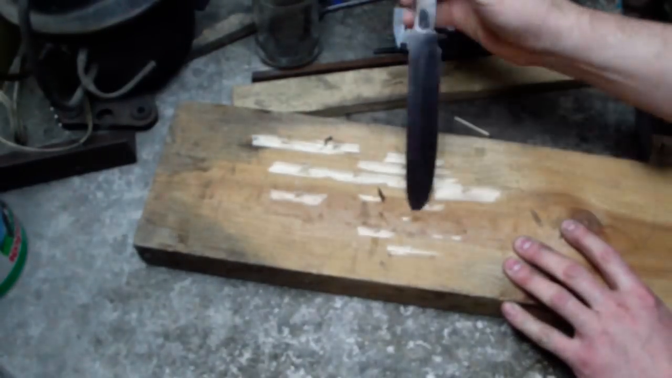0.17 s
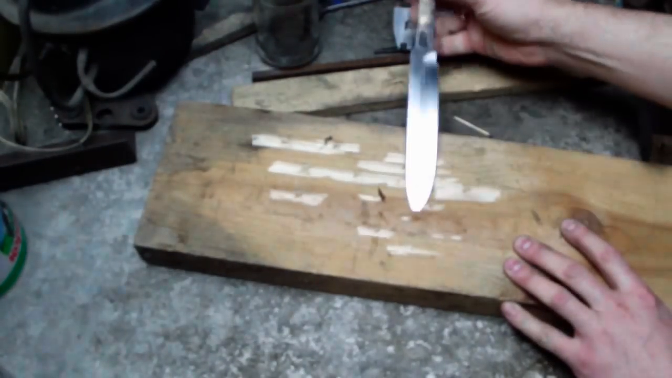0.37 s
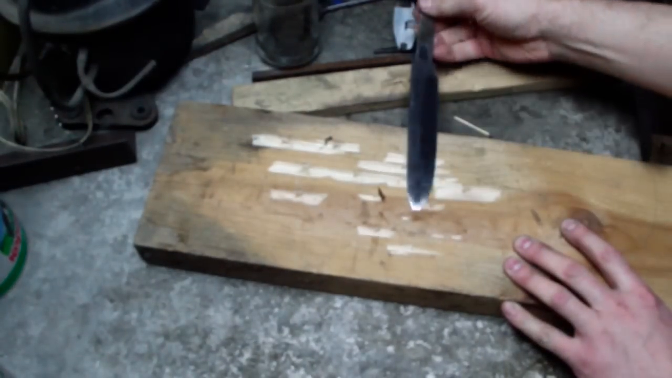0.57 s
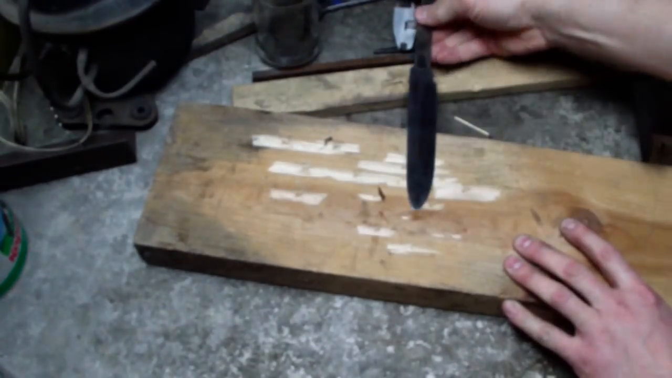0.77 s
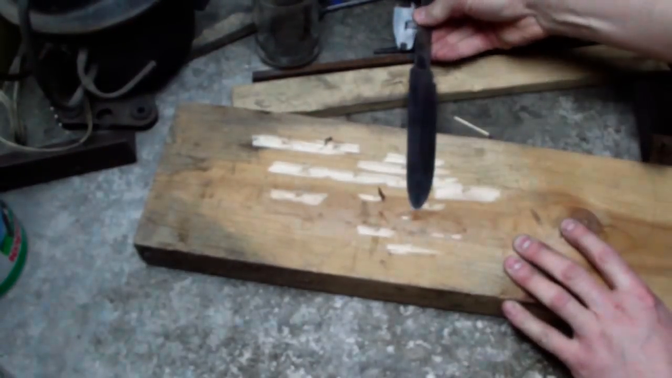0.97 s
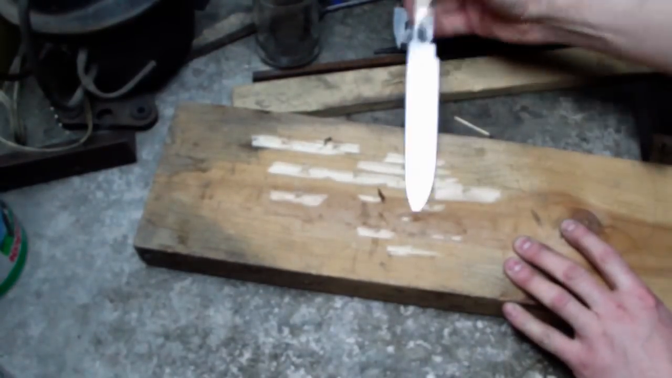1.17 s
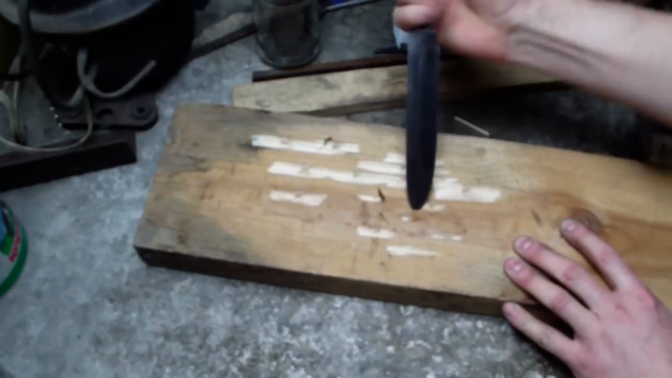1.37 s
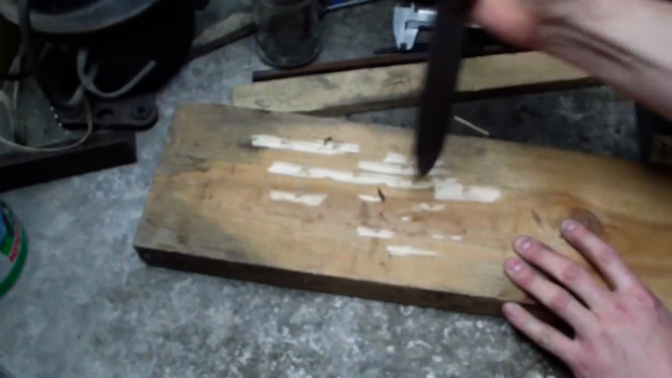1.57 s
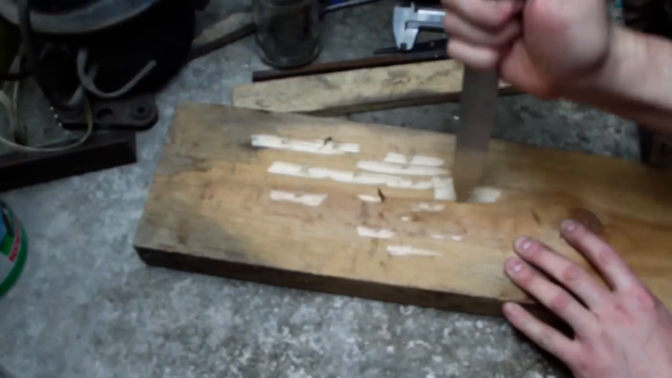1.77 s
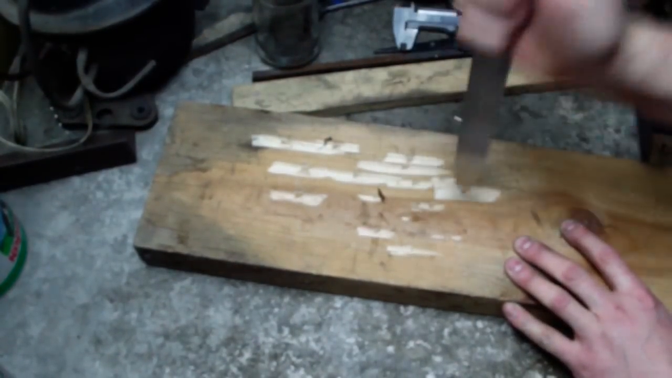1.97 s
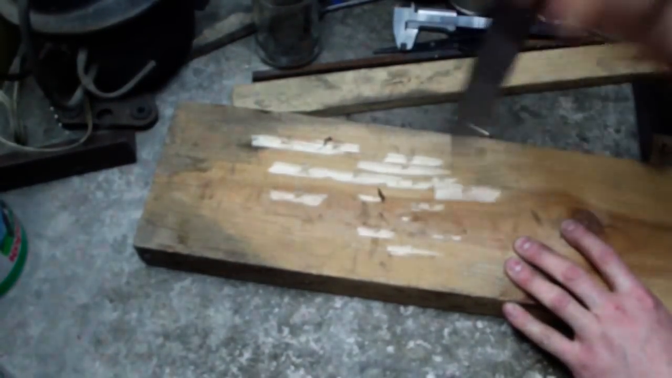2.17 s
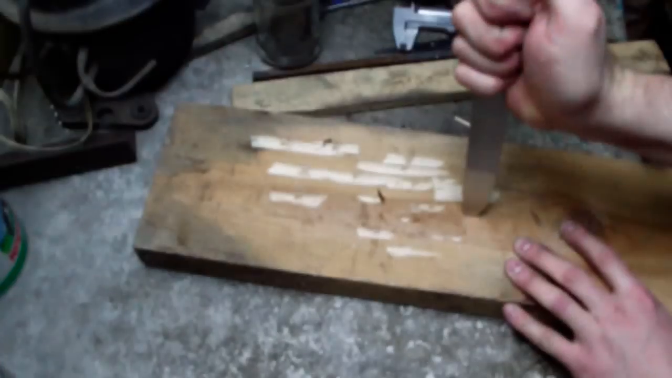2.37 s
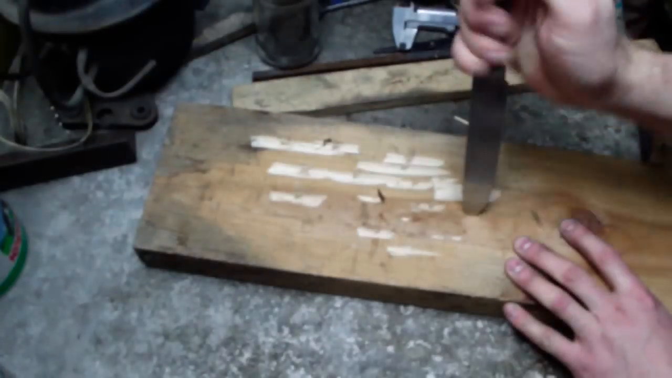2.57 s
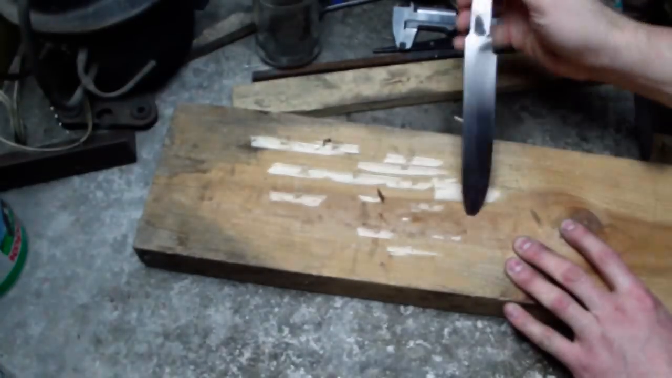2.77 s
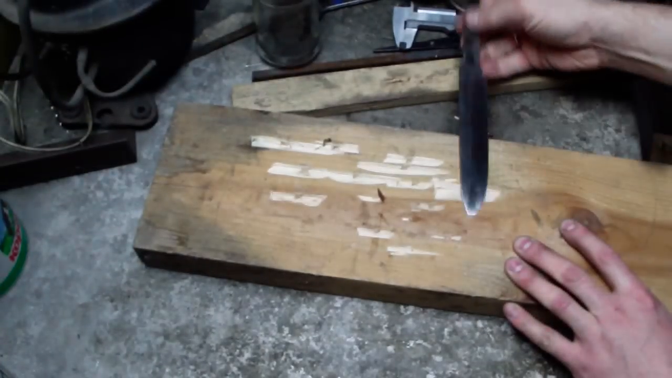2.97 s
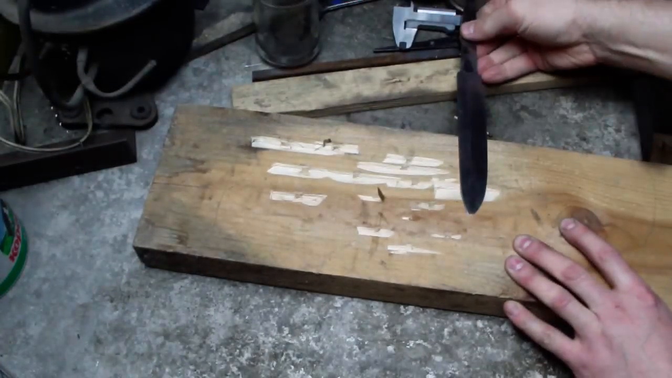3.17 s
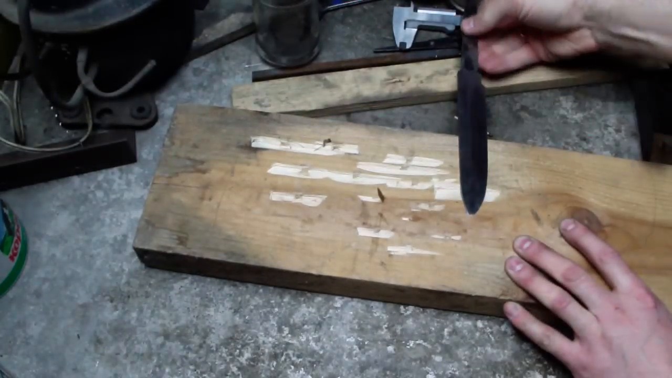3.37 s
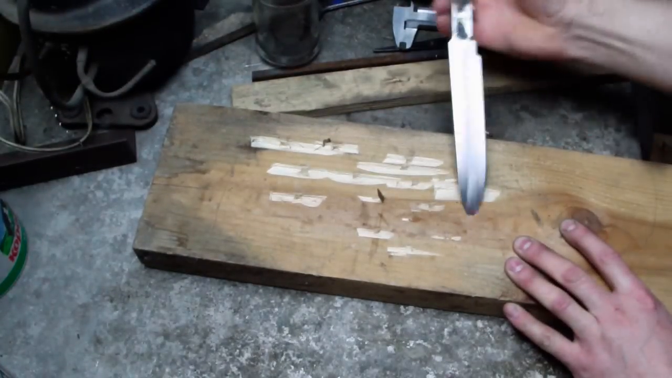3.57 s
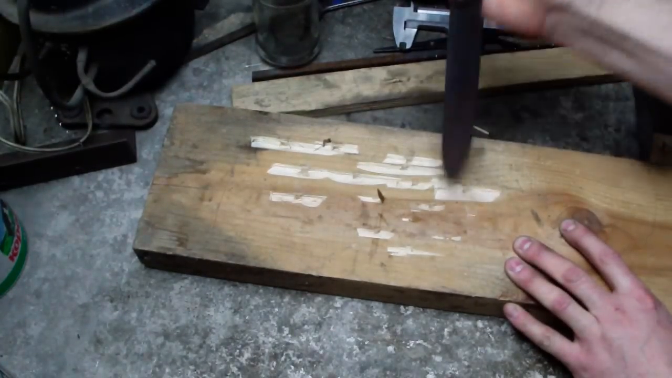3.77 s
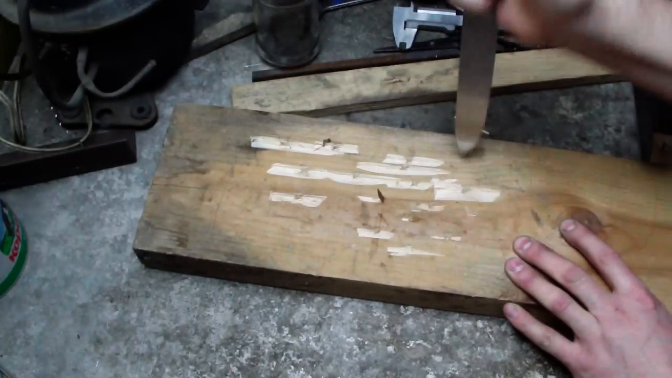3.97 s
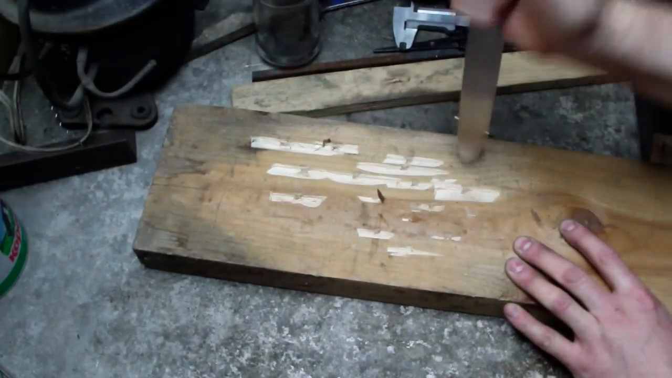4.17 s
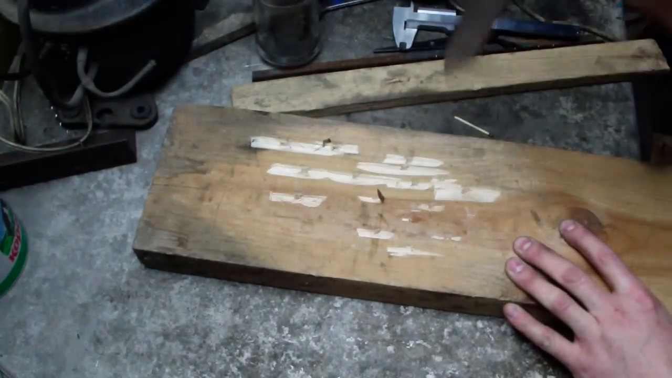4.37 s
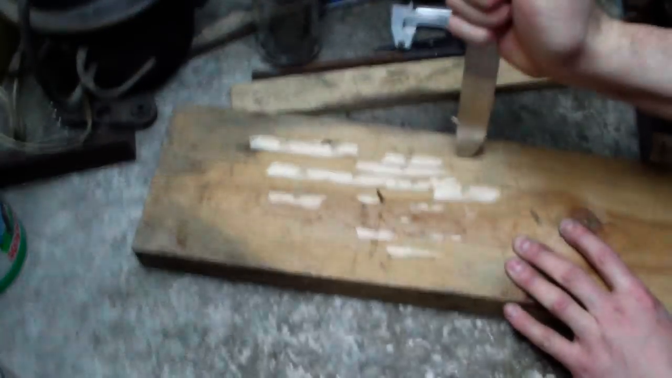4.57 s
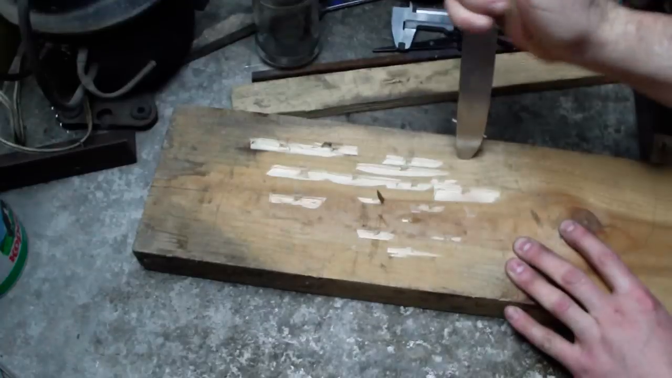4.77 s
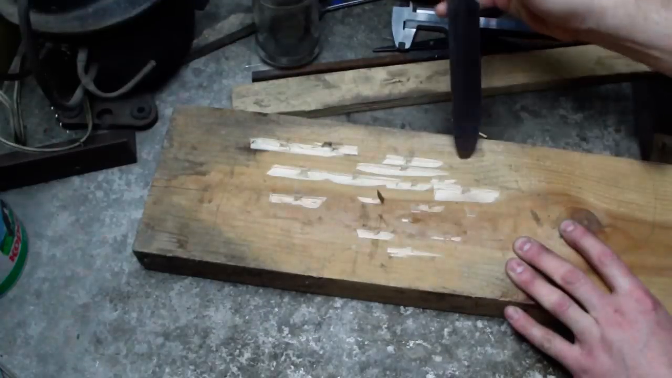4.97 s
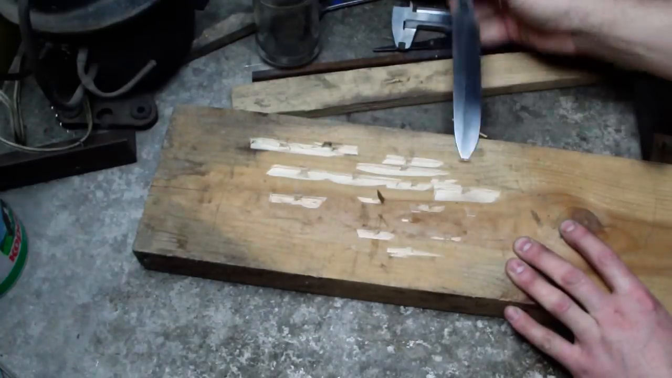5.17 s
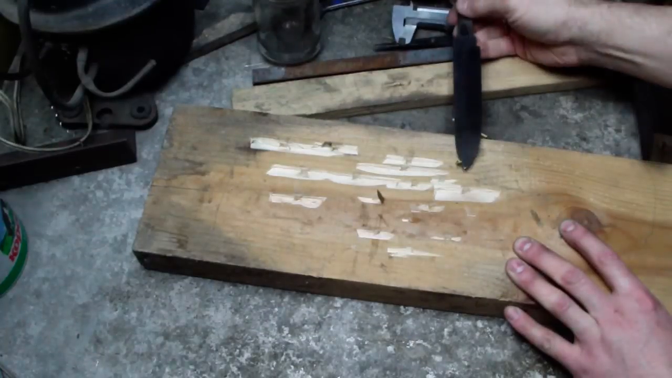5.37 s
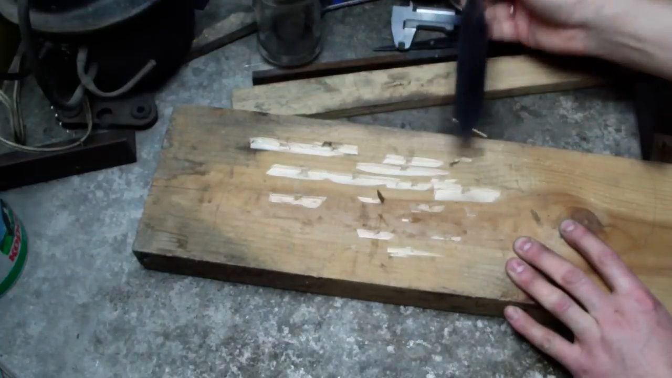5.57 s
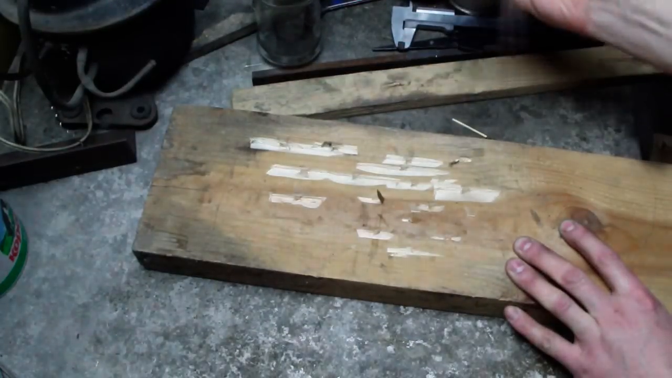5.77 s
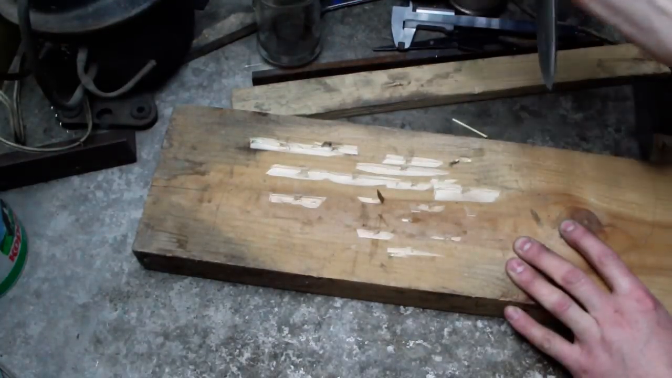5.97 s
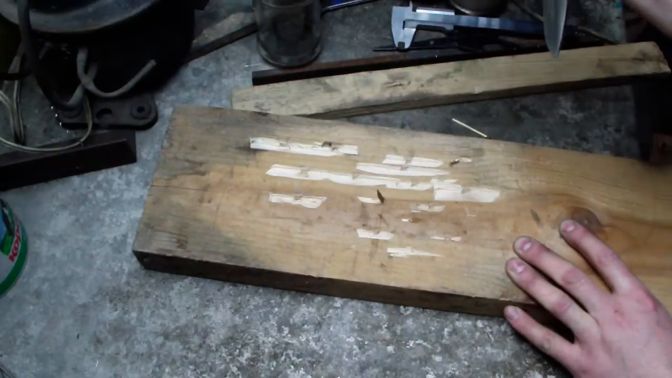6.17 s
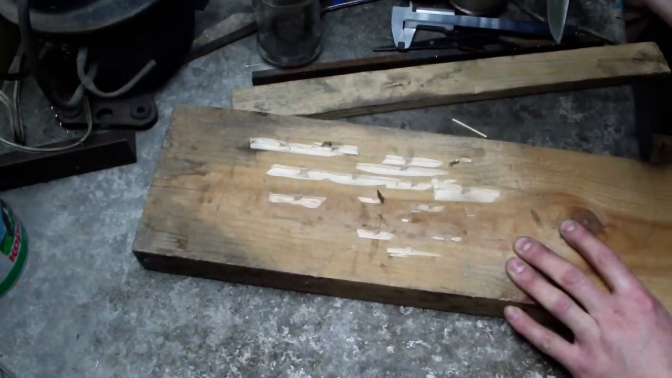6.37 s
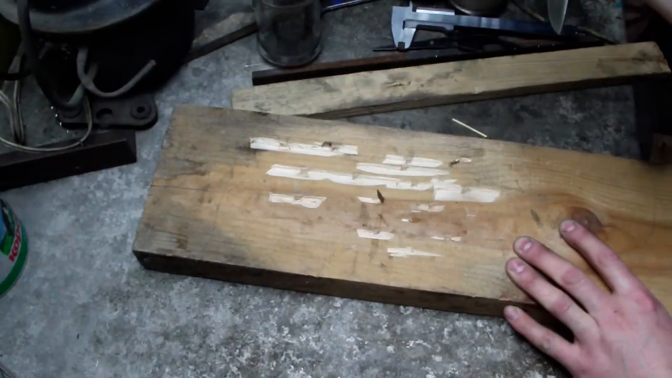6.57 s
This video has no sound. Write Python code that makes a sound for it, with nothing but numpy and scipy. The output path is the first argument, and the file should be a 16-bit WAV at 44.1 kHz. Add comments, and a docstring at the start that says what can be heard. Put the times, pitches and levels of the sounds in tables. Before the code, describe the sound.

Two violent knife stabs into a board rattle a workshop bench, separated by handle clicks, wooden knocks, soft rubbing and constant camera hiss.

```python
"""A knife is stabbed twice into a plank on a cluttered workbench: noisy, snapping bursts with rattling tools.
Between and after the stabs it is worked loose and turned in the hand, as knocks, clicks, rubs and one twang.
The plank rocks to rest in ever softer bounces, and filtered pushes ring the low modes of the bench.
The place is a small workshop with sparse reflections, heard from a camera standing close on the bench.
Its stereo microphone brings hiss, a thin whine and lens ticks; its limiter flattens the stabs."""
import sys
import numpy as np
from scipy import signal
from scipy.fft import rfft, irfft
from scipy.io import wavfile
from scipy.ndimage import uniform_filter1d

SR = 44100
rng = np.random.default_rng(int(sys.argv[2]) if len(sys.argv) > 2 else 0)


def waveform_to_disk(signal):
    """Save audio, clipped to [-1, 1], as 16-bit WAV at the path in sys.argv[1]."""
    frames = np.transpose(np.atleast_2d(signal))
    scaled = np.clip(frames, -1, 1) * 32767
    samples = np.round(scaled).astype(np.int16)
    wavfile.write(sys.argv[1], SR, samples)


N = 292294

# Steady hiss: (frequency [Hz], relative density [dB per Hz])
HISS_SPECTRUM = [(20, 10), (45, 8), (90, -3), (170, -10.5), (400, -13.5), (750, -16.5), (1500, -16),
                 (2200, -13.5), (3300, -10), (4000, -13), (5300, -22), (7600, -17.5), (9500, -21.5),
                 (15500, -26)]
# Resonances of the camera housing in the hiss: (frequency [Hz], width [Hz], height [dB])
HOUSING_PEAKS = [(1273, 76, 8.4), (1787, 165, 17), (2842, 257, 8.7), (14800, 600, 7.4)]
# Likeness of the hiss on the two sides: (frequency [Hz], left-right correlation [0..1])
HISS_LIKENESS = [(300, 1), (1400, 1), (3100, 0.99), (6800, 0.86), (12000, 0.7), (15000, .1)]
# Steady electronic whine: (frequency [Hz], RMS level [dB])
WHINE_TONES = [(7440, -42.5), (14880, -46.5), (15121, -65)]
HISS_LEVEL_DB = -33

# Decay of the workshop's reflections: (frequency [Hz], time to fall 60 dB [s])
ROOM_DECAY = [(100, 0.65), (500, 0.37), (1400, 0.27), (3500, 0.25), (9000, 0.13)]

# Pushes on the bench, mostly hands leaning on it, and the low thud of the knock at 1.76 s: (time [s], level
# [dB], length of push [s], strongest frequency [Hz])
BENCH_PUSHES = [(1.062, -18, 0.02, 36.2), (1.14, -27, 0.18, 27.6), (1.757, -25, 0.11, 40),
                (1.868, -24.5, .18, 55), (2.619, -28.5, 0.094, 30), (3.341, -22.5, 0.14, 28),
                (3.977, -17, 0.02, 32.66), (4.078, -23, .18, 54)]
# Bench sway and the ring of its top: (frequency [Hz], relative level [dB], time to fall 60 dB [s])
BENCH_MODES = [(28.25, 2, 0.64), (40, 2.5, 0.23), (50.2, 1, 0.39), (70.6, 2.5, 0.27), (78, -2.5, 0.4),
               (93, 4.5, 0.32), (169.2, -7, 0.28), (231.4, -0.5, 0.11), (412, -1.5, 0.076),
               (524, -2, 0.056), (657, -24, .12)]
# The arm bears down behind the point, then lets go once the rattle is over
SHOVE_S, SHOVE_HZ = 0.16, 90
RELEASE_AFTER_S, RELEASE_DB, RELEASE_S, RELEASE_HZ = 0.0299, -10.5, 0.062, 51
# What a knock passes on to the bench; growth is in dB per dB of the knock's body
JOLT_DB, JOLT_GROWTH, JOLT_S, JOLT_HZ = -17.5, 0.68, 0.12, 127

# Lens hunting for focus in runs of even steps: (start [s], length [s], level of first tick [dB])
FOCUS_RUNS = [(2.4685, 0.084, -23.5), (2.6854, 0, -23), (2.87, .2, -25.5), (3.17, .3105, -23),
              (3.6878, 0, -22.5), (4.127, .092, -19.5), (4.391, 0, -20.5), (4.81, .1012, -24.5),
              (6.2955, .2, -24)]
FOCUS_STEP_S = .1  # approximate spacing
# Rasp of the lens drive: (frequency [Hz], gain [dB])
LENS_RASP = [(1000, -4.5), (3500, 8.5), (6000, -6), (12000, -20.0)]

# Palm brushing softly as the grip changes: (start [s], length [s], RMS level before its fades [dB])
PALM_BRUSHES = [(1.099, 0.23, -37.5), (1.854, 0.085, -41)]
# Colour of the palm's rustle: (frequency [Hz], gain [dB])
PALM_COLOUR = [(200, -21), (370, 4.5), (600, -12), (900, 5), (1200, -7), (1650, 6), (2300, -2), (3500, -8),
               (6000, -24), (12000, -35)]
# Fingers sliding on the handle: (start [s], end [s], RMS level before its fades [dB], brightness [dB])
FINGER_SLIDES = [(0.022, 0.43, -37, -2), (2.649, 3.002, -34, 2), (3.483, 3.656, -43, 4),
                 (4.609, 4.807, -36.5, -3), (4.902, 5.22, -37.5, 6)]
# Colour of skin on the handle: (frequency [Hz], gain [dB])
SKIN_COLOUR = [(200, -17), (500, -5.5), (800, -3.5), (1200, 7.5), (2000, 0), (3200, 6.5), (5000, -17),
               (7000, -2), (8500, 2.5), (10000, -8), (12000, -14), (15000, -22)]

# Handle clicking against the fingers: (time [s], level before colouring [dB], brightness [dB], ringing [Hz])
HANDLE_CLICKS = [(0.2254, -27, -5, 1160), (0.233, -24, -3.5, 1120), (0.327, -44, 11.5, 2940),
                 (0.5555, -25.5, 7.5, 3260), (0.584, -33, 6.5, 530), (0.609, -21.5, -8, 3300),
                 (2.769, -22.5, -8.5, 1250), (2.883, -28, 1.5, 2940), (2.9722, -21, 4, 1250),
                 (4.875, -30.5, -4.5, 3050), (4.936, -32.5, 1, 2850), (4.96, -25.5, -1.5, 2840),
                 (4.9834, -22.5, -3.5, 2790), (5.06, -23, -2, 1280), (5.0838, -22, -18, 2440),
                 (5.267, -18, -7.5, 3120)]
# Knife held in the hand: (frequency [Hz], relative level [dB], time to fall 60 dB [s])
KNIFE_MODES = [(540, -13, 0.11), (943, -9, 0.12), (1210, 2, 0.024), (1575, 4, 0.044), (2630, 22, 0.0044),
               (3340, 11, 0.014), (5180, -15, 0.099), (6170, -20, 0.021), (8200, 23, 0.017),
               (8860, 17, 0.0073), (9000, 3, .03)]
CLICK_BODY_DB, CLICK_T60_S = -4, 0.08  # body relative to crack; decay of the chatter
# Colour of the handle: (frequency [Hz], gain [dB]); small and hard, with less body than the plank
HANDLE_COLOUR = [(300, -4.5), (550, -0.5), (800, -4.5), (1200, 4), (2300, 1), (3400, 2.5),
                 (5600, 3.5), (8500, 3), (10000, 12), (11500, 10.5), (14000, 13)]
# Ring of the freed blade: (frequency [Hz], relative level [dB], time to fall 60 dB [s])
TWANG_MODES = [(1263, 3, .06), (1480, -9, .04), (5520, -20, .09), (6020, -14, 0.085)]
TWANG_S, TWANG_DB = 2.9725, -15  # start and level

# Blade and plank knocking: (time [s], level before colouring [dB], hardness [dB], ringing [Hz])
KNOCKS = [(0.715, -37, 2.5, 910), (1.759, -26, 5, 1260), (1.933, -40.5, -1.5, 960), (3.091, -26, 1, 920),
          (3.1054, -19, 6.5, 1710), (3.974, -27.5, -4.5, 516), (4.0173, -27, 4, 3040),
          (4.0765, -27.5, 10, 1870), (4.572, -13, 31, 3140), (4.5774, -4, 27, 1850), (4.586, -24, 20, 1840),
          (5.166, -22.5, 4, 1270), (5.1738, -15, 5, 1690), (5.2248, -8, 2.5, 2540),
          (5.2995, -15.5, 9, 3050), (5.3071, -10.5, 6.5, 2920), (5.4434, -14, -3.5, 925),
          (5.451, -9, 8, 1090), (5.475, -17, -1, 420), (5.5174, -8, 4, 1625)]
# Plank: (frequency [Hz], relative level [dB], time to fall 60 dB [s])
PLANK_MODES = [(182, 3, 0.12), (224, -14, 0.12), (407.5, 8, 0.05), (491, -9, 0.12), (618, 10, 0.13),
               (738, -6, 0.067), (935, 15.5, 0.044), (1094, 5.5, 0.034), (1380, 9, 0.018),
               (1550, -4, 0.066), (2035, 8.5, 0.023), (2260, -7, 0.033), (2770, 12, 0.019),
               (3190, 23, 0.012), (3440, 10, 0.029)]
# Colour of every blow: (frequency [Hz], gain [dB])
BLOW_COLOUR = [(40, 11), (150, 2.5), (240, 2.5), (320, -0.5), (450, 4), (600, 3.5), (760, 0), (950, 4.5),
               (1250, 1.5), (2000, -0.5), (3200, 0.5), (3900, -7.5), (4800, -25), (5500, -23.5),
               (7200, -10.5), (8600, -10), (11000, -24.5), (15000, -46)]
# Colour of plank knocks: (frequency [Hz], gain [dB]); wood is fuller and flatter than steel
PLANK_COLOUR = [(100, 1.5), (200, 2), (300, -2), (450, -1), (600, 0), (900, -1.5), (1400, 0),
                (3000, -2.5), (4300, 2), (5500, 6), (8000, 3), (11000, 1.5), (14000, 5)]
# The plank rocks to rest, each bounce sooner and softer than the last
ROCK_START_S, ROCK_GAP_S, ROCK_GAP_KEPT = 5.581, .057, .85
ROCK_DB, ROCK_LOSS_DB, ROCK_HARDNESS_DB, ROCK_HZ = -22.5, 6, -6.5, 880
KNOCK_T60_S, HALVING_HARDNESS_DB = 0.14, 17  # harder contacts die sooner
KNOCK_EDGE_DB, EDGE_GROWTH = -21.5, 0.67  # the top treble grows more slowly than the blow

# Full stabs: (time [s], level [dB], length of rattle [s], 60 dB fall of its end [s], shove on bench [dB])
STABS = [(2.1821, -1, 0.13, 0.18, -5.5), (4.402, 1, 0.115, 0.15, -2.5)]
# Colour of the stabs: (frequency [Hz], gain [dB]); steel on steel is brighter than wood
STAB_COLOUR = [(70, -1.5), (150, 3.5), (250, 0.5), (650, -1.8), (1300, -0.22),
               (2200, 0.0), (3400, 3), (4500, 3), (9000, -0.9)]
EDGE_HZ = 15300  # upper band limit


def amp(db):
    """Decibels to an amplitude factor."""
    return 10 ** (np.asarray(db) / 20)


def evened(x):
    """Scales a sound to unit RMS."""
    return x / np.sqrt(np.mean(x ** 2) + 1e-20)


def read(points, hz):
    """Straight lines between points on a log-frequency axis."""
    f, value = np.transpose(points)
    return np.interp(np.log(hz + 1), np.log(f + 1), value)


def add(mix, s, sound):
    """Lays a sound into the mix at s seconds, cut off at the end of the mix."""
    part = mix[round(s * SR):][:len(sound)]
    part += sound[:len(part)]


def seconds(length):
    """Time axis in seconds."""
    return np.arange(int(length * SR)) / SR


def fade(t, t60):
    """Exponential decay that falls 60 dB in t60 seconds."""
    return amp(-60 * t / t60)


def tint(x, points):
    """Causal minimum-phase filter with the given spectrum."""
    log_gain = np.log(amp(read(points, abs(np.fft.fftfreq(4096, 1 / SR)))))
    taps = np.fft.ifft(np.exp(np.conj(signal.hilbert(log_gain)))).real[:2048]
    return signal.fftconvolve(x, taps)[:len(x)]


def at_level(x, db, size):
    """Scales a sound so that its loudest stretch of size samples has the given RMS level."""
    return x * amp(db) / np.sqrt(uniform_filter1d(x ** 2, size).max() + 1e-20)


def ring(modes, t, spread_db=2.5):
    """Free ringing of an object, with unit energy; each point of contact favours other modes."""
    signs = rng.choice([-1, 1], len(modes))
    weights = signs * amp(spread_db * (2 * rng.random(len(modes)) - 1))
    y = np.zeros(len(t))
    for weight, (hz, db, t60) in zip(weights, modes):
        y += weight * amp(db) * fade(t, t60) * np.sin(2 * np.pi * hz * t)
    return y / np.linalg.norm(y)


def chatter(t, t60, grain_db):
    """Dying crowd of tiny contacts of uneven size."""
    sizes = amp(grain_db * np.minimum(rng.exponential(1, len(t)), 4))
    return evened(rng.standard_normal(len(t)) * sizes) * fade(t, t60)


def blow(modes, levels, t60, hz, ring_db, snap, grain_db, favour_db, favour_q):
    """A sharp contact and its chatter ring an object; the spot struck favours one resonance."""
    t = seconds(.3)
    force = chatter(t, t60, grain_db)
    force[0] += snap
    ringing = signal.fftconvolve(force, ring(modes, t))[:len(t)]
    coloured = tint(force + amp(ring_db) * ringing, BLOW_COLOUR)
    sound = np.zeros(len(t))
    # body, crack and edge, each at its own level
    for edges, db in zip([(120, 1500), (1500, 4800), (5200, 15000)], levels):
        band = signal.butter(3, edges, "band", fs=SR, output="sos")
        sound += at_level(signal.sosfilt(band, coloured), db, size=256)
    return sound + amp(favour_db) * signal.lfilter(*signal.iirpeak(hz, favour_q, SR), sound)


def camera_noise():
    """Hiss coloured by the resonances of the housing, and a steady electronic whine."""
    hz = np.fft.rfftfreq(N, 1 / SR)
    shape_db = read(HISS_SPECTRUM, hz)
    for centre, width, db in HOUSING_PEAKS:
        shape_db += db / (1 + ((hz - centre) / width) ** 2) ** 2
    first, second = rfft(rng.standard_normal((2, N)))
    same = np.clip(read(HISS_LIKENESS, hz), 0, 1)
    other_side = same * first + np.sqrt(1 - same ** 2) * second
    hiss = irfft(np.array([first, other_side]) * amp(shape_db), N)
    t = np.arange(N) / SR
    whine = np.zeros(N)
    for f, db in WHINE_TONES:
        whine += amp(db) * np.sqrt(2) * np.sin(2 * np.pi * (f * t + rng.random()))
    return amp(HISS_LEVEL_DB) * evened(hiss) + whine


def room(x, wet_db=-15):
    """A small workshop: sparse reflections, each band dying at its own speed."""
    slots = np.arange(220, SR - 20, 20)  # one reflection in every 20 samples
    taps = np.zeros(SR)
    taps[slots + rng.integers(0, 20, len(slots))] = rng.choice([-1, 1], len(slots))
    hz, t, bands = signal.stft(taps, SR, nperseg=256)
    dying = bands * fade(t, read(ROOM_DECAY, hz)[:, None])
    tail = signal.istft(dying, SR, nperseg=256)[1]
    return x + amp(wet_db) * signal.fftconvolve(x, tail / np.linalg.norm(tail))[:N]


def bench(shudder=0.066):
    """Hands, stabs and knocks set the bench swaying; each push drives the modes near its own frequency."""
    pushes = list(BENCH_PUSHES)
    for s, _, rattle_s, _, db in STABS:
        pushes.append((s, db, SHOVE_S, SHOVE_HZ))
        pushes.append((s + rattle_s + RELEASE_AFTER_S, db + RELEASE_DB, RELEASE_S, RELEASE_HZ))
    for s, db, hardness, _ in KNOCKS:
        pushes.append((s, JOLT_DB + JOLT_GROWTH * (db - hardness), JOLT_S, JOLT_HZ))
    out, t = np.zeros(N), seconds(1)
    for s, db, length, hz in pushes:
        force = shudder * rng.standard_normal(len(t)) * np.exp(-2 * t / length)
        force[0] += 1
        two_octaves = signal.butter(1, [hz / 2, hz * 2], "band", fs=SR, output="sos")
        force = signal.sosfilt(two_octaves, force)
        sway = signal.fftconvolve(force, ring(BENCH_MODES, t))[:len(t)]
        add(out, s, at_level(sway, db, size=1024))
    return out


def lens(hz=3350, rise_s=0.00083, grit=0.67, rebound_s=0.0044, rebound_db=-11, rolling_db=-4):
    """Each step of the lens drive ticks and rebounds; once the drive is rolling, the steps are softer."""
    out, t = np.zeros(N), seconds(.02)
    for start, length, db in FOCUS_RUNS:
        step_times = np.linspace(start, start + length, round(length / FOCUS_STEP_S) + 1)
        for step, s in enumerate(step_times):
            rasp = evened(tint(rng.standard_normal(len(t)), LENS_RASP))
            tone = np.sin(2 * np.pi * hz * rng.uniform(0.99, 1.05) * t) + grit * rasp
            tick = at_level(tone * t * np.exp(-t / rise_s), db + rolling_db * (step > 0), size=128)
            add(out, s, tick)
            add(out, s + rebound_s, amp(rebound_db) * tick)
    return out


def brushes(grain_db=5.0):
    """The palm makes a dull, grainy rustle that swells and fades."""
    out = np.zeros(N)
    for start, length, db in PALM_BRUSHES:
        steady = np.zeros_like(seconds(length))  # time stands still: no decay
        rub = tint(chatter(steady, 1, grain_db), PALM_COLOUR)
        add(out, start, amp(db) * evened(rub) * signal.windows.tukey(len(rub), .8))
    return out


def slides(patchy_db=7.0, grain_db=4.0, catches_per_s=60, catch_db=9, catch_t60=0.0074):
    """Skin slips over the handle in tiny grains under an uneven grip, and now and then catches."""
    out, t = np.zeros(N), seconds(1)
    for start, end, db, bright_db in FINGER_SLIDES:
        grip = np.tanh(evened(uniform_filter1d(rng.standard_normal(SR), size=700)))
        catch_starts = 1. * (rng.random(SR) < catches_per_s / SR)
        catches = signal.fftconvolve(catch_starts, fade(t, catch_t60))[:SR]
        rub = chatter(np.zeros(SR), 1, grain_db) * amp(patchy_db * grip)
        rub *= 1 + amp(catch_db + bright_db) * np.minimum(catches, 1)  # a dull slide catches less
        rub = tint(tint(rub, SKIN_COLOUR), [(3000, 0), (7000, bright_db)])
        rub = rub[:len(seconds(end - start))]
        add(out, start, amp(db) * evened(rub) * signal.windows.tukey(len(rub), .5))
    return out


def handle():
    """The knife clicks as it is turned; a brighter click has more edge."""
    out = np.zeros(N)
    for s, db, bright_db, hz in HANDLE_CLICKS:
        levels = db + CLICK_BODY_DB, db, db + bright_db
        click = blow(KNIFE_MODES, levels, CLICK_T60_S, hz, ring_db=-5, snap=7.5, grain_db=0.0,
                     favour_db=4.5, favour_q=16)
        add(out, s, click)
    return tint(out, HANDLE_COLOUR)


def twang():
    """The point springs free of the wood and the blade rings briefly on its own."""
    out = np.zeros(N)
    add(out, TWANG_S, at_level(ring(TWANG_MODES, seconds(.2)), TWANG_DB, size=256))
    return out


def plank_knocks():
    """Every knock and the rocking bounces, as (time [s], level [dB], hardness [dB], ringing [Hz])."""
    rows, s = list(KNOCKS), ROCK_START_S
    for k in range(7):
        rows.append((s, ROCK_DB - k * ROCK_LOSS_DB, ROCK_HARDNESS_DB, ROCK_HZ))
        s += ROCK_GAP_S * ROCK_GAP_KEPT ** k
    return rows


def plank():
    """Hard knocks are short cracks; soft ones have more body and chatter for longer."""
    out = np.zeros(N)
    for s, db, hardness, hz in plank_knocks():
        levels = db - hardness, db, KNOCK_EDGE_DB + EDGE_GROWTH * db
        t60 = KNOCK_T60_S * 2 ** (-hardness / HALVING_HARDNESS_DB)
        knock = blow(PLANK_MODES, levels, t60, hz, ring_db=-14.5, snap=7.6, grain_db=3.0,
                     favour_db=1, favour_q=7.8)
        add(out, s, knock)
    return tint(out, PLANK_COLOUR)


def stabs(snaps_per_s=90, snap_db=17, ring_db=-20, bounces_per_s=170, bounce_db=3, bounce_t60=0.0076,
          sag_db=5, grain_db=3.0):
    """The point bites into the plank, and loose tools bounce on the bench until they settle."""
    out, t = np.zeros(N), seconds(.6)
    for s, db, rattle_s, t60, _ in STABS:
        bounces = (rng.random(len(t)) < bounces_per_s / SR) * rng.random(len(t)) * 2
        bounces[0] = 1  # the point itself
        swell = 1 + amp(bounce_db) * signal.fftconvolve(bounces, fade(t, bounce_t60))[:len(t)]
        rattle = chatter(np.maximum(t - rattle_s, 0), t60, grain_db)  # steady, then settling
        snaps = (rng.random(len(t)) < snaps_per_s / SR) * rng.standard_normal(len(t))
        snaps *= t < rattle_s  # fibres giving way
        sag = amp(-sag_db * np.minimum(t / rattle_s, 1))
        force = (rattle + amp(snap_db) * snaps) * swell * sag
        ringing = signal.fftconvolve(force, ring(PLANK_MODES, t))[:len(t)]
        sound = tint(tint(force + amp(ring_db) * ringing, STAB_COLOUR), BLOW_COLOUR)
        add(out, s, at_level(sound, db, size=2048))
    return out


def scene():
    """Everything sounds close to the middle and reaches the right port one sample sooner."""
    in_room = room(brushes() + slides() + handle() + twang() + plank() + stabs())
    left, right = camera_noise() + bench() + lens() + in_room
    return np.array([np.append(0, left[:-1]), right])


def record(dry, ceiling_db=0.86, recovery_db_per_s=420):
    """A fast limiter holds peaks near a ceiling just over full scale, clips the rest, then limits the band."""
    over_db = np.maximum(20 * np.log10(abs(dry).max(0) + 1e-9) - ceiling_db, 0)
    fall = np.arange(N) * recovery_db_per_s / SR
    held_db = np.maximum.accumulate(over_db + fall) - fall  # instant hold, steady recovery
    limited = np.clip(dry / amp(uniform_filter1d(held_db, size=24)), -1, 1)
    lowpass = signal.firwin(511, EDGE_HZ, window=("kaiser", 9), fs=SR)
    return signal.oaconvolve(limited, lowpass[None], "same")


dry = scene()
out = record(dry)
waveform_to_disk(out)
```